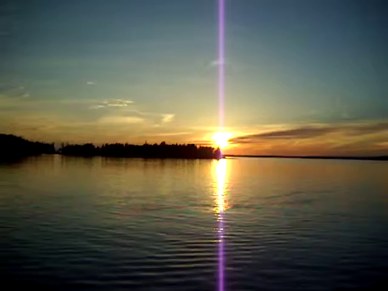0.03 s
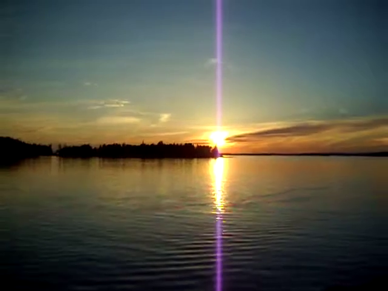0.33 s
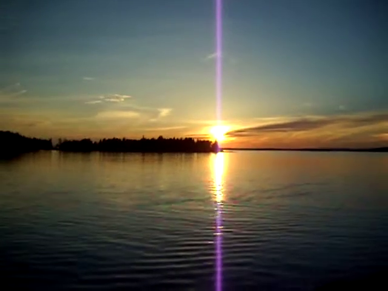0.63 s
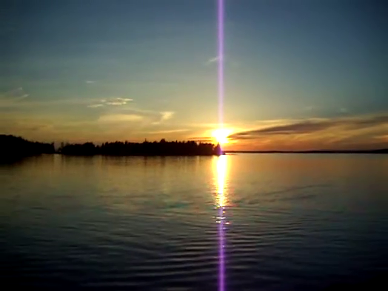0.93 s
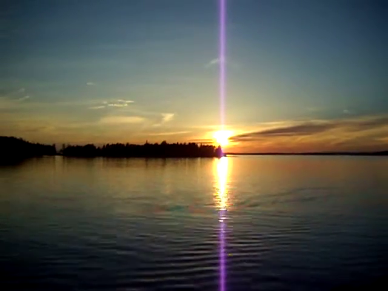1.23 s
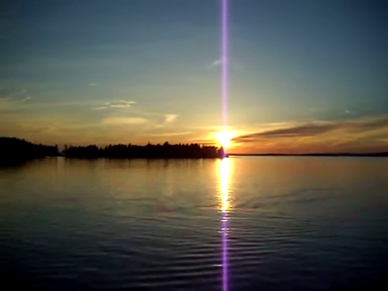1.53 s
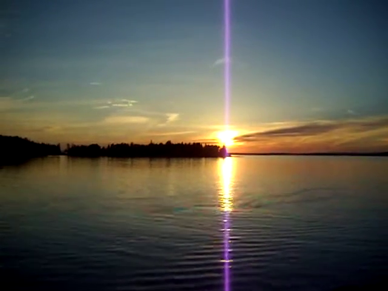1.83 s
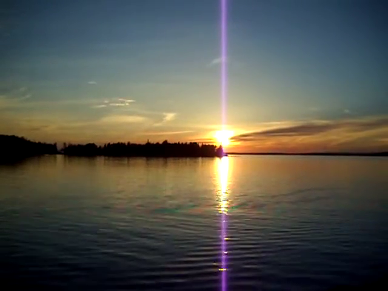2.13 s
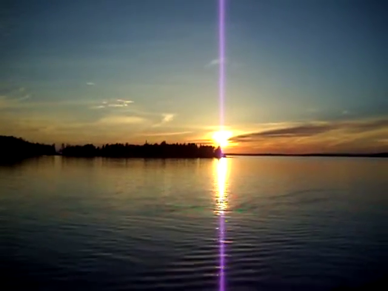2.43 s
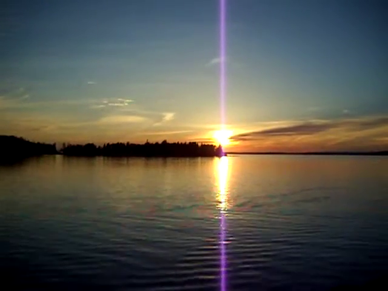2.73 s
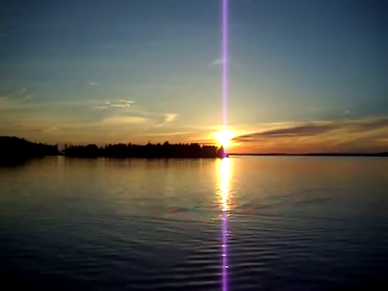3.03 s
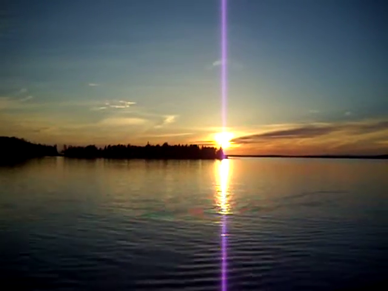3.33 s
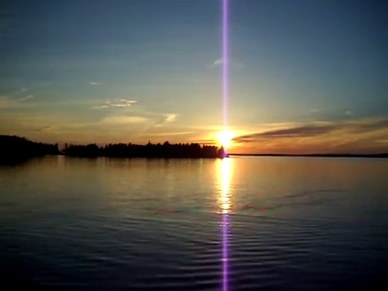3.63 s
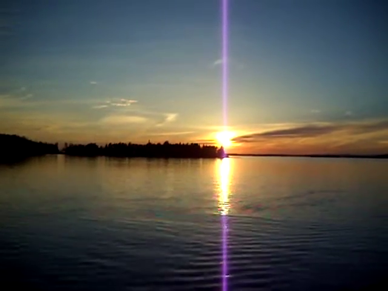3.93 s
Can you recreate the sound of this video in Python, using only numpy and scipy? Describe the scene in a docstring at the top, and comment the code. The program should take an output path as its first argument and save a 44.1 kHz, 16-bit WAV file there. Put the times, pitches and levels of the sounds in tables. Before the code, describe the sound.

Distant tree frogs trill faintly by a lake, with a loud knock on the microphone first.

```python
"""Tree frogs across a lake at dusk

Calm water, heard from the shore through the narrow-band microphone of a hand-held camera. Far off,
tree frogs trill in short rising chirps over an even hiss and the drone of a distant motor. Right at
the microphone, one hard knock overloads the camera; then its casing clicks and fingers bump it softly."""
import sys
import numpy as np
from scipy import signal
from scipy.fft import rfft, irfft
from scipy.io import wavfile

SR = 44100
rng = np.random.default_rng(int(sys.argv[2]) if len(sys.argv) > 2 else 0)


def wav_record(signal):
    """Record a signal, one row per channel, as 16-bit PCM in the file named by sys.argv[1]."""
    frames = np.transpose(np.atleast_2d(signal))
    bounded = np.clip(frames, -1, 1)
    # unit amplitude maps onto the largest positive 16-bit level
    quanta = np.round(bounded * 32767).astype(np.int16)
    wavfile.write(sys.argv[1], SR, quanta)


N = 176400
T = np.arange(N) / SR


def from_db(db):
    """Decibels to gain."""
    return 10 ** (np.asarray(db) / 20)


def unit_rms(x):
    """Scale to rms 1."""
    return x / np.sqrt(np.mean(x ** 2) + 1e-20)


def drift(rate_hz):
    """Smooth random wander with a spread of about 1."""
    pole = np.exp(-200 * np.pi * rate_hz / SR)
    noise = rng.standard_normal(N // 100 + 1002)  # one value per 100 samples
    slow = signal.lfilter([1], [1, -2 * pole, pole * pole], noise)[1000:]
    return np.interp(np.arange(N) / 100, np.arange(len(slow)), unit_rms(slow))


def resonate(x, hz, width_hz):
    """A resonance with gain 1 at its top."""
    r = np.exp(-np.pi * width_hz / SR)
    feedback = [1, -2 * r * np.cos(2 * np.pi * hz / SR), r * r]
    return signal.lfilter(np.array([1, 0, -1]) * (1 - r * r) / 2, feedback, x + 1e-18)


def steep_band(x, hz, width_hz):
    """One resonance applied twice, for steep flanks."""
    return resonate(resonate(x, hz, width_hz), hz, width_hz)


def narrow_noise(hz, width_hz):
    """A narrow band of noise at rms 1."""
    return unit_rms(steep_band(rng.standard_normal(N), hz, width_hz))


def contact(at, scuff_db, t60):
    """A touch on the casing: a unit impulse, then a short dying scuff."""
    decay = from_db(-60 * np.minimum(np.abs(T - at) / t60, 2))
    scuff = rng.standard_normal(N) * (T > at) * decay
    push = from_db(scuff_db) * scuff / np.sqrt(np.sum(scuff ** 2))
    push[int(at * SR)] += 1
    return push


# Noise floor at the shore: f/Hz, level/dB in a 1 Hz band
AIR_SPECTRUM = [(20, -80.5), (45, -82), (100, -85.5), (220, -86), (380, -86), (600, -88.5), (900, -90),
                (1600, -91.5), (2500, -93.5), (3700, -94)]

def air():
    """Even hiss of the open air and of the microphone itself."""
    hz, db = np.transpose(AIR_SPECTRUM)
    bin_hz = np.maximum(np.arange(N // 2 + 1) * SR / N, 1)
    gain = from_db(np.interp(np.log(bin_hz), np.log(hz), db))
    return irfft(rfft(rng.standard_normal(N)) * gain, N) * np.sqrt(SR / 2)


# Partials of the distant motor: harmonic number, rms level/dB before the swell, swell factor
MOTOR_PARTIALS = [(3, -59.5, 0.23), (4, -65.5, .5), (6, -61, 1.33), (7, -69, .8), (8, -67.5, 1.05),
                  (9, -73, 0.48), (10, -76, 0.78), (12, -77, .4)]
# Swell and fade of the drone: t/s, level/dB
MOTOR_SWELL = [(0, -3.5), (.55, -5.5), (1.2, -1), (1.8, 1.5), (2.4, -1.5), (3.0, -8.5), (3.5, -10),
               (4, -13)]
# Fainter, unsteady hums: f/Hz, width/Hz, rms level/dB
HUMS = [(177, 4.7, -69.5), (253, 16, -71.5)]

def motor(fundamental_hz=48.4, wander=.003, flutter_db=1.55):
    """A far engine with two fainter hums; each partial flutters on its way over the water."""
    turns = np.cumsum(fundamental_hz * (1 + wander * drift(2.93))) / SR
    swell_db = np.interp(T, *np.transpose(MOTOR_SWELL))
    drone = 0
    for harmonic, db, follows in MOTOR_PARTIALS:
        amplitude = np.sqrt(2) * from_db(db + follows * swell_db + flutter_db * drift(4.7))
        drone += amplitude * np.sin(2 * np.pi * (round(harmonic) * turns + rng.random()))
    return drone + sum(from_db(db) * narrow_noise(hz, width) for hz, width, db in HUMS)


def frog_chorus(db=-65, peak_s=.82, spread_s=.6):
    """The farthest frogs blur into one faint band that comes and goes."""
    swell = np.exp(-.5 * ((T - peak_s) / spread_s) ** 2)
    return from_db(db) * swell * narrow_noise(hz=1820, width_hz=425)


# Modes of the camera body: f/Hz, relative level/dB, t60/s
BODY_MODES = [(457, -30.5, 0.054), (598, -25.5, 0.044), (658.4, -25, 0.085), (762, 4, 0.0047),
              (866, -22, 0.04), (1006, -10, .013), (1231, -45.5, 0.23), (1685, -43, 0.059),
              (2050, -10.5, 0.011), (3270, -24.5, 0.007)]

def knock(at=.0596, db=7, rise_s=.000428, damped_after_s=.034):
    """A hard blow on the camera body: a dead thump and a hollow ring that the hand soon stops."""
    t = np.maximum(T - at, 0)
    ring = 0
    for hz, mode_db, t60 in BODY_MODES:
        decay = np.exp(-np.minimum(np.log(1000) * t / t60, 20))
        ring -= from_db(db + mode_db) * decay * np.sin(2 * np.pi * hz * t)
    attack = 1 - np.exp(-t / rise_s)
    hand_damping = np.interp(t, [damped_after_s - .005, damped_after_s + .005], [1, .3])
    low_cut = signal.butter(2, 161, "high", fs=SR, output="sos")
    return signal.sosfilt(low_cut, ring * attack * hand_damping)


# Clicks right at the microphone: t/s, push level/dB, ring f/Hz, ring width/Hz, relative tap level/dB
CASING_CLICKS = [(0.1335, 15.5, 2963, 1500, -3), (0.1527, 4, 2500, 1000, -17), (0.1539, 6, 3640, 700, -16),
                 (0.156, 10.5, 3510, 900, -12.5), (3.1375, 0.5, 2390, 450, -7.5),
                 (3.141, -14, 2600, 447, -3), (3.146, -6.5, 2600, 450, -6.5), (3.153, -1, 2560, 510, -8),
                 (3.167, -5, 2570, 410, -17.5), (3.186, -13.5, 2700, 400, -19.5),
                 (3.1955, -11.5, 2560, 400, -27)]

def casing_clicks():
    """Plastic parts snap: a bright ring over a duller tap."""
    tap_band = signal.butter(1, [120, 1480], "band", fs=SR, output="sos")
    out = 0
    for at, db, hz, width_hz, tap_db in CASING_CLICKS:
        push = from_db(db) * contact(at, scuff_db=-12.5, t60=.019)
        tap = from_db(tap_db) * signal.sosfilt(tap_band, push + 1e-18)
        out += steep_band(push, hz, width_hz) + tap
    return out


# Bumps close to the microphone: t/s, push level/dB, pitch factor, thud cutoff f/Hz, relative rub level/dB
FINGER_BUMPS = [(.2604, -5, 1.06, 1300, -15.5), (2.5341, -1.5, 1.01, 1302, -10.5),
                (3.7098, -5.5, 1, 700, -14.5), (3.714, -13.5, 1.2, 1100, -1.5),
                (3.727, 5.5, 1.12, 600, -21), (3.7316, -7.5, 0.95, 700, -6)]
# Modes that a bump sets ringing: f/Hz before the pitch factor, width/Hz, relative level/dB
THUD_MODES = [(384, 240, 1), (643, 190, -6.5), (830, 160, -3.5)]

def finger_bumps():
    """Fingers shift on the casing: a soft low thud with a little bright rub."""
    out = 0
    for at, db, pitch, cutoff_hz, rub_db in FINGER_BUMPS:
        push = from_db(db) * contact(at, scuff_db=-3.5, t60=.067)
        thud = sum(from_db(level) * resonate(push, hz * pitch, width) for hz, width, level in THUD_MODES)
        soft_touch = signal.butter(2, cutoff_hz, fs=SR, output="sos")
        rub = from_db(rub_db) * steep_band(push, hz=2600, width_hz=1900)
        out += signal.sosfilt(soft_touch, thud) + rub
    return out


def frog_chirp(at, hz, db, sweep, width_s=.0069):
    """One frog note: a sine that sweeps up under a bell-shaped envelope."""
    near = np.abs(T - at) < .05
    t = T[near] - at
    turns = hz * t + .5 * sweep * t * t + rng.random()
    out = np.zeros(N)
    out[near] = from_db(db) * np.exp(-.5 * (t / width_s) ** 2) * np.sin(2 * np.pi * turns)
    return out


# Lone chirps, far off: t/s, f/Hz, level/dB, sweep/(Hz/s)
LONE_CHIRPS = [(.397, 1950, -54.5, 6000), (.453, 2000, -56, 12000), (.624, 2040, -54, 11000),
               (.744, 1985, -53.5, 11000)]
# Far trills: first t/s, last t/s, spacing/s, crest f/Hz, crest level/dB, swell/dB, slowing, sweep/(Hz/s)
TRILLS = [(.51, .955, .056, 1925, -62.5, -2, 0.0093, 7000),
          (1.014, 1.586, .0573, 1894, -56, 4, 0.035, 10000),
          (1.986, 2.531, .061, 1932, -46, 6, 0.058, 13700),
          (1.993, 2.567, .0574, 2172, -55.5, 2.5, .005, 2500)]
# Returns from the shore: delay/s, relative level/dB
SHORE_ECHOES = [(.009, -21), (0.025, -17)]

def tree_frogs(crest=.55, pitch_sag=.063, pitch_jitter=.007):
    """Far trills arch in pitch and slow a little, most swelling midway; the shore echoes faintly."""
    calls = sum(frog_chirp(*row) for row in LONE_CHIRPS)
    for first, last, spacing, hz, db, swell_db, slowing, sweep in TRILLS:
        count = int(round((last - first) / spacing)) + 1
        for progress in np.linspace(0, 1, count):
            effort = -((progress - crest) / crest) ** 2  # -1 at the first chirp, 0 at the crest
            at = first + (last - first) * (progress - slowing * progress * (1 - progress))
            pitch = 1 + pitch_sag * effort + pitch_jitter * rng.standard_normal()
            calls += frog_chirp(at, hz * pitch, db + swell_db * effort, sweep)
    return calls + sum(from_db(db) * np.interp(T - delay, T, calls, left=0) for delay, db in SHORE_ECHOES)


def scene():
    """The far sounds of the lake and the close handling noise, at one mono microphone."""
    lake = tree_frogs() + frog_chorus() + motor() + air()
    return (lake + knock() + casing_clicks() + finger_bumps())[None]


def record(dry):
    """The narrow-band camera starts a moment in, settles from a small offset and overloads on the knock."""
    start_s, settle_s = .041, .26
    ceiling, hardness = .71, 7.2
    offset = from_db(-36.5) * np.exp(-(T - start_s) / settle_s)
    started = (dry - offset) * (T > start_s)
    band = signal.sosfilt(signal.cheby2(8, 17, 3930, fs=SR, output="sos"), started)
    narrow = signal.sosfilt(signal.ellip(9, .3, 80, 4300, fs=SR, output="sos"), band)
    clipped = narrow / (1 + np.abs(narrow / ceiling) ** hardness) ** (1 / hardness)
    return signal.sosfilt(signal.cheby2(12, 70, 15800, fs=SR, output="sos"), clipped)


dry = scene()
out = record(dry)
wav_record(out)
```